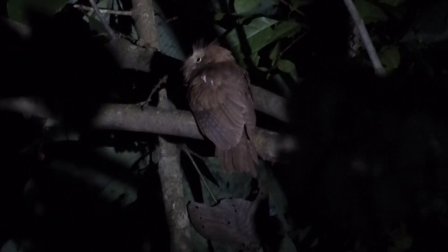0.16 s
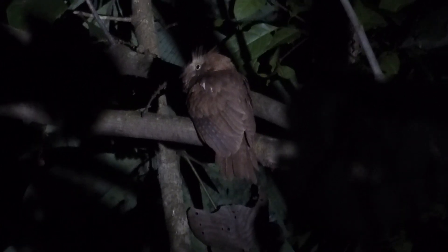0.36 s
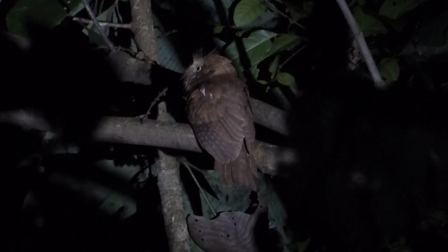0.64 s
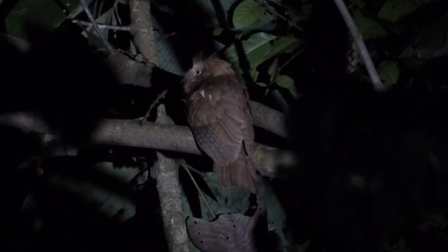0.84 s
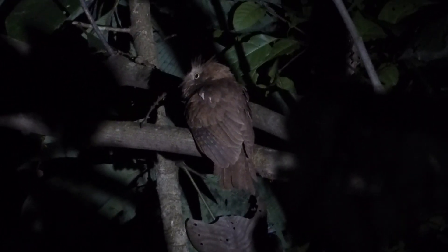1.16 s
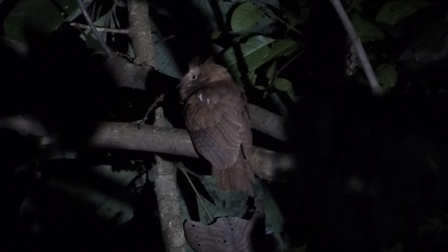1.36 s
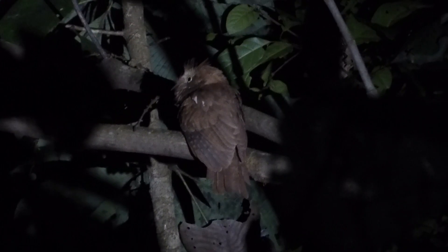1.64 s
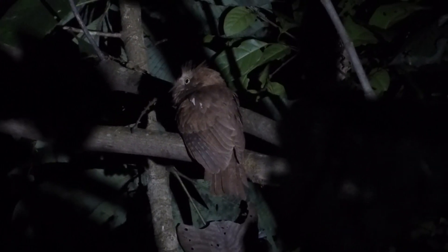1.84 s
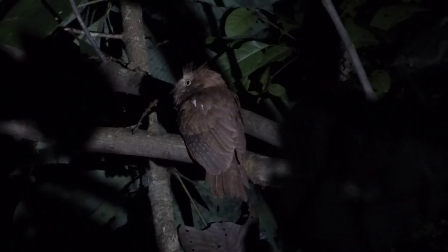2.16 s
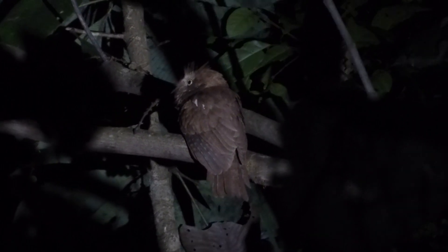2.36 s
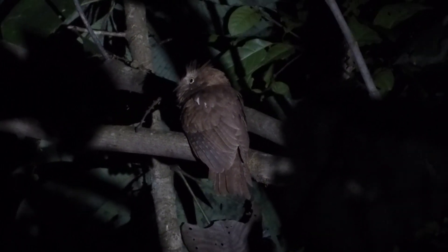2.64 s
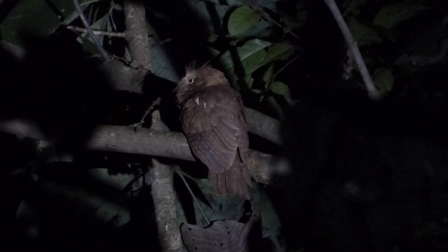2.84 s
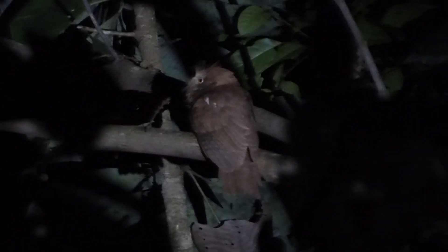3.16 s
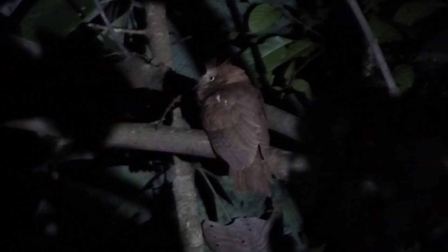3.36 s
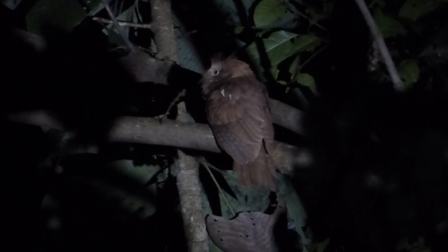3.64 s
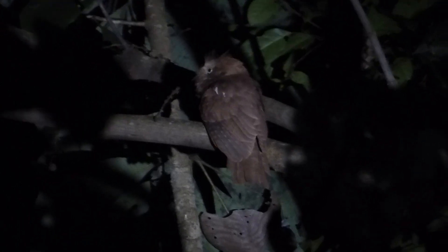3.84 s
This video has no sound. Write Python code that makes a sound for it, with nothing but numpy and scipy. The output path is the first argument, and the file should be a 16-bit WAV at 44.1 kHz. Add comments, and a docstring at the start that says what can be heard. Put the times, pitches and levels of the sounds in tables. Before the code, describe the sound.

A night bird hoots three times, at about 1.3, 2.5 and 3.6 seconds, each a short grunt then a low, pure rising note with a light forest echo. Faint insect buzzing and cricket trills run throughout, with sharp chirps close by. Twigs snap a few times from 1.2 seconds, loudest near 2.2. Faint thin whistles and leaf stirs come after 2 seconds, and a katydid rasps high from 2.7.

```python
"""Night forest. From the start the microphone hears leaf hush, a low drone, far buzzing insects and trilling
crickets; faint crickets tick in turn, then two near insects chirp. At 1.2 s the first of a few twigs or
drips snaps in the leaves, and a perched frogmouth gives the first of three hoots: a short grunt, then a
nearly pure rising note, answered by the trunks. From 2 s come two thin whistles and soft stirs of leaves,
and from 2.7 s a katydid rasps its wings in the treble."""
import sys
import numpy as np
from scipy import signal
from scipy.fft import rfft, irfft, next_fast_len
from scipy.io import wavfile
from scipy.ndimage import uniform_filter1d, map_coordinates

SR = 44100
rng = np.random.default_rng(int(sys.argv[2]) if len(sys.argv) > 2 else 0)


def generate_wav(signal):
    """Clip the signal to [-1, 1] and save it as 16-bit WAV at the path in sys.argv[1]."""
    frames = np.transpose(np.atleast_2d(signal))
    scaled = np.clip(frames, -1, 1) * 32767
    pcm = np.round(scaled).astype(np.int16)
    wavfile.write(sys.argv[1], SR, pcm)


N = 176400
T = np.arange(N) / SR


def amp(db):
    return 10 ** (np.asarray(db) / 20)


def unit(x):
    return x / np.sqrt(np.mean(x ** 2) + 1e-20)


def along(points, hz):
    """Read (Hz, value) points on a log axis."""
    f, v = np.transpose(points)
    return np.interp(np.log(hz + 1), np.log(f + 1), v)


def wobble(rate):
    """A smooth random curve, rate knots a second."""
    return map_coordinates(rng.standard_normal(int(N * rate / SR) + 4), [T * rate])


def lump(t, length):
    """A raised-cosine swell centred on t = 0."""
    return np.cos(np.pi * np.clip(t / length, -.5, .5)) ** 2


def filtered(x, response):
    """x times a response of frequency."""
    m = next_fast_len(x.shape[-1] + SR // 4)
    return irfft(rfft(x, m) * response(np.fft.rfftfreq(m, 1 / SR)), m)[..., :x.shape[-1]]


def resonance(hz, half_width_hz):
    """A bell-shaped response around hz."""
    return lambda f: 1 / (1 + ((f - hz) / half_width_hz) ** 2)


def panned(x, db):
    return x * amp([[db / 2], [-db / 2]])


def grains(spectrum, per_s, scatter_db):
    """Random clicks of uneven size through a spectrum, rms 1."""
    hits = (rng.random(N) < per_s / SR) * rng.standard_normal(N)
    hits *= amp(scatter_db * rng.standard_normal(N))
    return unit(filtered(hits, lambda hz: amp(along(spectrum, hz))))


def forest(x, echoes, width):
    """Scatter from trunks and leaves. Echoes: (onset [s], t60 [s], level [dB]); width is the side gain."""
    t, tail = T[:SR + SR // 2], 0
    for onset, t60, db in echoes:
        decay = amp(-60 * t / t60) * np.clip(2 * t / onset - 1, 0, 1)
        mid, side = rng.standard_normal((2, len(t))) * decay / np.linalg.norm(decay)
        tail = tail + amp(db) * np.array([mid + width * side, mid - width * side])
    return signal.fftconvolve(x[None], tail, axes=1)[:, :N]


# how alike the microphone's two sides are: (frequency [Hz], correlation [-1..1])
LIKENESS = [(60, .7), (130, 0.6), (250, 1), (700, 0.58), (1290, -0.49), (2400, 0.064), (4400, 0.95),
            (8100, 0.75), (15000, 0.52)]

def rush(response, patchy_db):
    """Noise from all around, rms 1, with patches of random gain in time and frequency."""
    cells = signal.stft(rng.standard_normal((2, N)), nperseg=512)[2]
    patches = uniform_filter1d(uniform_filter1d(rng.standard_normal(cells.shape[1:]), 6, 0), 12, 1)
    pair = signal.istft(cells * amp(patchy_db * unit(patches)), nperseg=512)[1][:, :N]
    angle = lambda hz: np.arccos(np.clip(along(LIKENESS, hz), -1, 1)) / 2
    mid, side = filtered(pair, lambda hz: response(hz) * [np.cos(angle(hz)), np.sin(angle(hz))])
    return unit(np.array([mid + side, mid - side]))


def bands(rows):
    """Gently wavering noise in a few resonant bands."""
    return sum(amp(db + 1.3 * wobble(2)) * rush(resonance(hz, width / 2), patchy_db=1.04)
               for hz, width, db in rows)


# colour of the hush all around: (frequency [Hz], relative level [dB])
HUSH_SPECTRUM = [(18, -76), (30, -22.5), (70, -22), (150, -9), (342, -3.5), (1170, -9.5), (2630, -12.5),
                 (4210, -17), (4920, -8), (5470, -10.5), (5910, -8), (6740, -13.5), (8310, -26.5),
                 (10200, -9), (15600, -46.5)]
# its slow rise: (time [s], level [dB])
HUSH_LEVEL = [(0.0, -54), (3.73, -49), (4.0, -49)]

def leaf_hush():
    """The hush of leaves and distance under everything."""
    db = np.interp(T, *np.transpose(HUSH_LEVEL)) + 1.3 * wobble(3.6)
    return amp(db) * rush(lambda hz: amp(along(HUSH_SPECTRUM, hz)), patchy_db=3)


# drone in the distance: (centre [Hz], width [Hz], relative level [dB])
DRONE_BANDS = [(589, 78, 4.5), (316, 200, 6)]
# its swell: (time [s], gain [dB])
DRONE_SWELL = [(0.0, -72.5), (0.58, -60.5), (3.61, -61), (4.0, -62.5)]

def drone():
    """Low bands of distant noise swell and hold."""
    return amp(np.interp(T, *np.transpose(DRONE_SWELL))) * bands(DRONE_BANDS)


# insects far off in the trees: (centre [Hz], width [Hz], level [dB])
BUZZ_BANDS = [(4894, 324, -54), (8363, 620, -54), (9920, 580, -59), (11520, 1600, -60.5), (3730, 560, -65),
              (7300, 880, -66)]

def far_insects():
    """Far choruses merge into buzzing bands of noise."""
    return bands(BUZZ_BANDS)


# cricket chorus: (pitch [Hz], detuning scale [Hz], pulse rate [1/s], level [dB])
CHORUS = [(4986, 45, 43, -54), (2654, 35, 41, -69), (3400, 18, 23, -71.5)]

def trilling_crickets(singers=4, duty=.49):
    """A few singers on each pitch, pulsing out of step, blurred by the forest."""
    out = 0
    for hz, spread, rate, db in CHORUS:
        group = 0
        for haste, detune, offset in rng.standard_normal((singers, 3)):
            beat = np.cumsum(rate * (1 + .036 * haste + .0498 * wobble(3))) / SR + offset
            pitch = hz + spread * (.5 * detune + .3 * wobble(20))
            tone = np.sin(2 * np.pi * np.cumsum(pitch) / SR)
            group = group + amp(1.9 * wobble(2)) * lump(beat % 1 - .5, duty) * tone
        out = out + amp(db) * unit(group)
    return out + forest(out, [(.01, .501, -.43)], width=.62)


# faint crickets, centred: (first tick [s], period [s], pitch [Hz])
TICKING = [(.04, .667, 7160), (.425, .676, 7450), (.265, .678, 7370), (.225, .676, 7270)]
# the trees' answer to ticks, chirps and whistles: (onset [s], t60 [s], level [dB])
INSECT_ECHO = [(0.001, .6, -7.5)]

def ticking_crickets(levels_db=(-51.5, -56.5, -57.5, -57), tick_s=.032, fall_hz=120):
    """Short falling notes, each cricket at its own period."""
    out = 0
    for (first, period, hz), db in zip(TICKING, levels_db):
        t = (T - first + period / 2) % period - period / 2  # time from the nearest tick
        cycles = hz * t - fall_hz * t * t / tick_s / 2
        out = out + amp(db) * lump(t, tick_s) * np.sin(2 * np.pi * cycles)
    return out + forest(out, INSECT_ECHO, width=.6)


# calls of two insects near the microphone, a little to the right: (time [s], gain [dB])
SOFT_CALLS = [(0.2346, -30), (0.4945, -30), (1.127, -29), (1.4241, -30.5), (2.0985, -30), (2.3194, -30.5),
              (3.0869, -30.5), (3.8332, -31)]
LOUD_CALLS = [(0.7723, -20), (0.9915, -20), (2.2234, -19.5)]
# each one's chirp and its trunk returns: (delay [s], nominal length [s], pitch [Hz], level [dB])
SOFT_CHIRP = [(.002, .011, 6060, 0.5), (.008, .011, 6070, 2), (.02, .007, 5910, -1.5),
              (.024, .005, 6050, -5.5), (.029, .008, 5980, -2), (.035, .007, 5980, -9.5)]
LOUD_CHIRP = [(.002, 0.0092, 6150, -4.5), (.01, .011, 6112, -2), (.022, 0.008, 5960, -7.5),
              (0.031, 0.019, 6087, -6), (0.04, 0.011, 5990, -12), (.047, 0.0061, 6100, -6.5),
              (.054, 0.0072, 6050, -8), (0.061, 0.0056, 6090, -12.5), (0.083, 0.013, 6100, -11.5)]

def near_insect(calls, pulses, octave_db, octave_fade_db_per_s=251.5):
    """Every call is the same chirp from the same perch: a noisy tick and a short tone, then its returns from
    the trunks, each heard as a short lump of tone."""
    t = T[:SR // 5] - .01
    octave = amp(octave_db - octave_fade_db_per_s * t)
    tick = unit(filtered(rng.standard_normal(len(t)), resonance(6400, half_width_hz=400)))
    chirp = amp(-16) * lump(t + .0013, .0077) * tick
    for delay, length, hz, db in pulses:
        phase = 2 * np.pi * hz * t
        chirp += amp(db) * lump(t - delay, 1.14 * length) * (np.sin(phase) + octave * np.sin(2 * phase))
    starts = np.zeros(N)
    for s, db in calls:
        starts[round((s - .01) * SR)] = amp(db)
    chirps = signal.fftconvolve(starts, chirp)[:N]
    # blurred returns: a short ping, a little flatter than the chirp
    ping = amp(.5) * lump(t - .006, .006) * np.sin(2 * np.pi * 6040 * t)
    blur = forest(signal.fftconvolve(starts, ping)[:N], [(.019, .4, -2)], width=.6)
    return panned(chirps, -2) + forest(chirps, INSECT_ECHO, width=.6) + blur


# twigs or drips on either side of the microphone:
# (time [s], level [dB], centre [Hz], width [octaves], t60 [s], left-right [dB], relative ring [dB])
TWIG_SNAPS = [(1.217, -28.5, 3100, 1.35, 0.007, 9, -7), (1.31, -39.5, 1100, 2.8, 0.014, 4, -27),
              (1.758, -32.5, 2190, 1.7, 0.015, 4.5, -1), (2.240, -22, 1410, 1.15, 0.02, -8, -30),
              (2.249, -21.5, 670, 3.1, 0.025, -0.5, -18), (2.260, -26.5, 1810, 0.9, 0.011, -6, -20),
              (2.261, -24.5, 568, 0.92, 0.027, 1, -22.5), (2.914, -40, 1280, 0.98, 0.026, 2, 2),
              (2.976, -40.5, 1310, 1, 0.021, -1.5, -5), (3.042, -35.5, 1950, 3.6, 0.014, -15, -5.5)]
# short scatter among the leaves: (onset [s], t60 [s], level [dB])
LEAF_ECHO = [(.006, 0.295, -9)]

def snaps(wood_hz=963, wood_t60_s=.016, top_hz=7000):
    """Each snap is a dying burst of noise through a broad band, over a short woody ring."""
    out, t = np.zeros((2, N)), T[:SR // 10]
    lead = 128  # samples of room for the filter to ring ahead
    for s, db, hz, octaves, t60, pan_db, wood_db in TWIG_SNAPS:
        crack = np.roll(rng.standard_normal(len(t)) * amp(-60 * t / t60), lead)
        band = lambda f: np.exp(-2 * (np.log2((f + 1) / hz) / octaves) ** 2) / (1 + (f / top_hz) ** 10)
        crack = filtered(crack, band)
        ring = amp(wood_db - 60 * t / wood_t60_s) * np.sin(2 * np.pi * wood_hz * t)
        burst = crack / abs(crack).max() + np.roll(ring, lead)
        at = round(s * SR) - lead
        out[:, at:at + len(t)] += panned(amp(db) * burst, pan_db)
    return out + forest(out.mean(0), LEAF_ECHO, width=.7)


# the grunt that opens a hoot: (time from the note's start [s], pitch [Hz])
GRUNT_PITCH = [(-.065, 325), (-.042, 398), (-.022, 355), (-.012, 392), (0, 468)]

def hoot_pitch(start, end, plateau, scoop, scoop_s, sag, rise, middle, rise_s, drop, drop_s=.013):
    """A wavering grunt slides up, then the note scoops up, sags, rises and drops."""
    t = np.clip(T, start, end)
    hz = plateau - scoop * np.exp((start - t) / scoop_s) - sag * (t - start)
    hz += rise / (1 + np.exp((middle - t) / rise_s))
    hz -= drop * np.exp((t - end) / drop_s)
    grunt = np.interp(T - start, *np.transpose(GRUNT_PITCH))
    return uniform_filter1d(np.where(T < start, grunt, hz), size=250)


# the bird on its perch, just left of centre; one contour a hoot: (time [s], level [dB])
HOOT_LEVELS = [
    [(1.27, -57.5), (1.3, -45), (1.336, -29.5), (1.364, -38.5), (1.386, -28.5), (1.466, -33),
     (1.528, -27.5), (1.618, -11.5), (1.694, -12.5), (1.714, -14.5), (1.735, -37.5)],
    [(2.42, -57.5), (2.476, -39), (2.548, -20), (2.58, -16), (2.668, -17), (2.85, -11.5), (2.876, -12.5),
     (2.892, -68.5)],
    [(3.553, -64), (3.563, -41), (3.594, -35.5), (3.672, -12.5), (3.73, -11.5), (3.794, -17),
     (3.836, -12.5), (3.956, -12.5), (3.976, -14.5), (3.992, -49)],
]
# each note's pitch: (start [s], end [s], plateau [Hz], scoop [Hz], scoop time [s], sag [Hz/s],
# full rise [Hz], middle of rise [s], rise time [s], last drop [Hz])
HOOT_NOTES = [(1.319, 1.722, 512.4, 43, .04, 107, 723, 1.783, .068, 92),
              (2.5, 2.88, 551.6, 97, .032, 324, 300, 2.816, .057, 63),
              (3.613, 3.982, 556.4, 101, .024, 251, 253, 3.9215, .05, 46)]
# throat resonances: (overtone frequency [Hz], level [dB])
THROAT_RESPONSE = [(900, -61), (1040, -52.5), (1120, -53.5), (1195, -58.5), (1255, -46), (1520, -58),
                   (1660, -72.5), (1810, -59), (1900, -59.5), (2050, -76), (2420, -69.5), (3050, -62.5)]

def frogmouth(pans_db=(1.6, .9, .44), octaves_db=(-6, -.5, -1), break_s=.007, swell_db=6.5):
    """A nearly pure note; its faint overtones grow with effort and pass the throat's resonances."""
    out = 0
    for contour, note, pan_db, octave_db in zip(HOOT_LEVELS, HOOT_NOTES, pans_db, octaves_db):
        start, end = note[:2]
        hz = hoot_pitch(*note)
        phase = 2 * np.pi * np.cumsum(hz) / SR
        db = np.interp(T, *np.transpose(contour), -120, -120)
        effort_db, overtones = .2 * (db + 10.5), 0
        for k in range(2, 6):
            throat_db = along(THROAT_RESPONSE, k * hz) + octave_db * (k == 2)
            flicker_db = 4 * wobble(70)
            overtones += amp(effort_db + throat_db + flicker_db) * np.sin(k * phase)
        gate = uniform_filter1d(1. * (T > start + .012) * (T < end), size=400)
        # the voice swells, then breaks just before the note
        u = (T - start) / break_s
        swell, dip = amp(swell_db * np.exp(-(u + 2) ** 2)), 1 - .69 * np.exp(-u * u)
        voice = uniform_filter1d(amp(db), size=300) * swell * dip
        hoot = np.sqrt(2) * (voice * np.sin(phase) + gate * overtones)
        out = out + panned(hoot, pan_db) + trunk_answer(hoot)
    return out


# clear returns from the trunks: (delay [s], level [dB], left-right [dB])
TRUNK_RETURNS = [(.066, -20, -0.5), (.15, -25.5, -1)]
# scatter from deeper in the forest: (onset [s], t60 [s], level [dB])
HOOT_TAIL = [(.05, .38, -23.5), (0.062, 1.75, -26)]

def trunk_answer(hoot):
    """The forest throws the hoot back, best near the top of the note."""
    far = filtered(hoot, lambda f: resonance(620, half_width_hz=75)(f) ** .5)
    returns = sum(panned(amp(db) * np.pad(far, (round(s * SR), 0))[:N], pan_db)
                  for s, db, pan_db in TRUNK_RETURNS)
    return returns + forest(far, HOOT_TAIL, width=.2)


# faint whistles among the crickets: (centre [s], length [s], pitch [Hz], level [dB])
THIN_WHISTLES = [(2.109, .24, 7100, -52), (2.922, 0.15, 7300, -64)]

def whistles():
    """Two thin steady tones swell and fade."""
    out = sum(amp(db) * lump(T - s, length) * np.sin(2 * np.pi * hz * T)
              for s, length, hz, db in THIN_WHISTLES)
    return out + forest(out, INSECT_ECHO, width=.6)


# leaves stirring: (centre [s], length [s], level [dB])
LEAF_STIRS = [(2.297, 0.19, -60), (3.201, 0.31, -53.5), (3.773, 0.66, -54)]
# colour of their crackle: (frequency [Hz], relative level [dB])
LEAF_SPECTRUM = [(300, -9.5), (800, 4.5), (1500, -1), (4000, -18), (11000, -7.5), (15700, -27)]

def rustles():
    """Soft, uneven swells of leaf crackle."""
    swell = sum(amp(db) * lump(T - s, length) for s, length, db in LEAF_STIRS) * amp(1.8 * wobble(24.94))
    leaves = swell * grains(LEAF_SPECTRUM, per_s=2500, scatter_db=2.5)
    return leaves + forest(leaves, LEAF_ECHO, width=1.2)


# the katydid's strokes, centred: (peak time [s], level [dB], fall [dB/s])
WING_STROKES = [(2.705, -49, 198), (2.81, -54, 227.5), (2.912, -52, 198.5), (3.559, -34.5, 503),
                (3.654, -35, 348.5), (3.777, -34.5, 284.5)]
# colour of its rasp: (frequency [Hz], relative level [dB])
WING_SPECTRUM = [(8000, -37.5), (10000, -21), (10600, -9.5), (11400, 1), (13600, 4), (15000, 2.5),
                 (15600, -1.5)]

def katydid(rise_db_per_s=315):
    """Dense uneven tooth clicks, swelling and fading with each stroke of the wing."""
    strokes = sum(amp(db - np.where(T < s, rise_db_per_s * (s - T), fall * (T - s)))
                  for s, db, fall in WING_STROKES)
    rasp = strokes * grains(WING_SPECTRUM, per_s=5600, scatter_db=1)
    return rasp + forest(rasp, [(.004, .15, -5.5), (.03, .6, -13.5)], width=.8)


def scene():
    """The forest as it reaches the microphone."""
    bed = leaf_hush() + drone() + far_insects() + trilling_crickets() + ticking_crickets()
    near = near_insect(SOFT_CALLS, SOFT_CHIRP, octave_db=-32.5)
    near += near_insect(LOUD_CALLS, LOUD_CHIRP, octave_db=-17)
    return bed + near + snaps() + frogmouth() + whistles() + rustles() + katydid()


def record(dry):
    """The microphone thins the deep bass; nothing is kept above the band limit."""
    low_cut_hz, top_hz = 85, 15719
    return filtered(dry, lambda hz: (1j * hz / (low_cut_hz + 1j * hz)) ** 2 * (hz < top_hz))


dry = scene()
out = record(dry)
generate_wav(out)
```